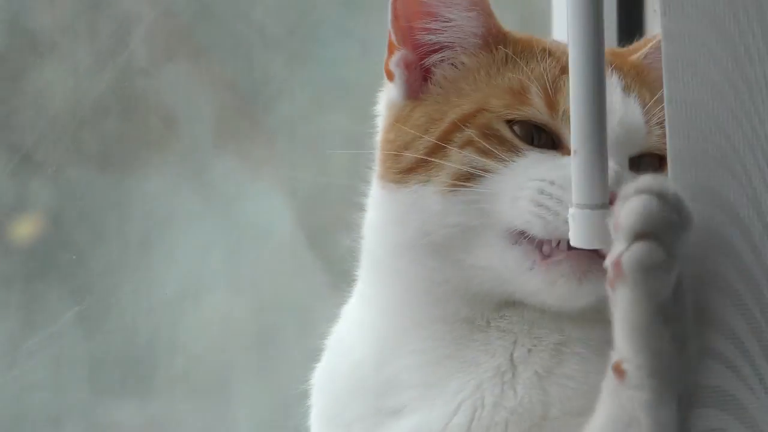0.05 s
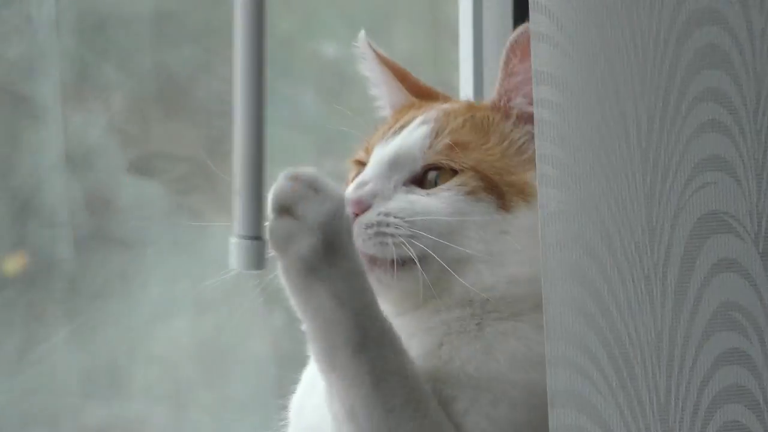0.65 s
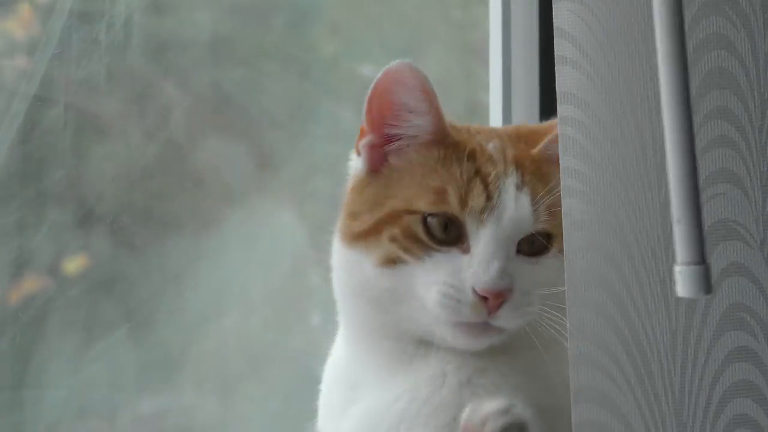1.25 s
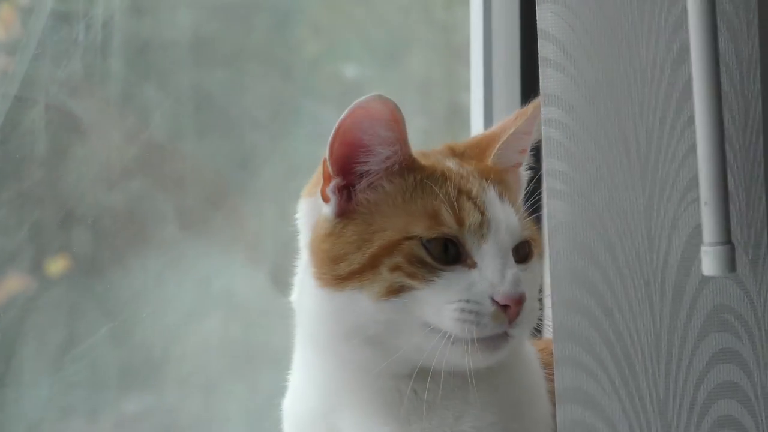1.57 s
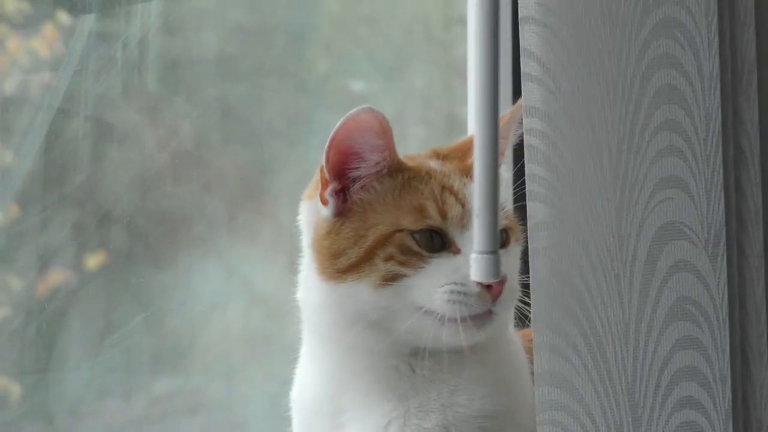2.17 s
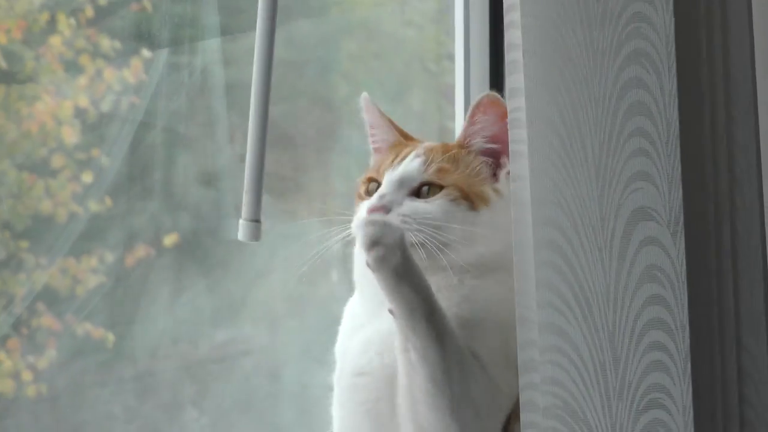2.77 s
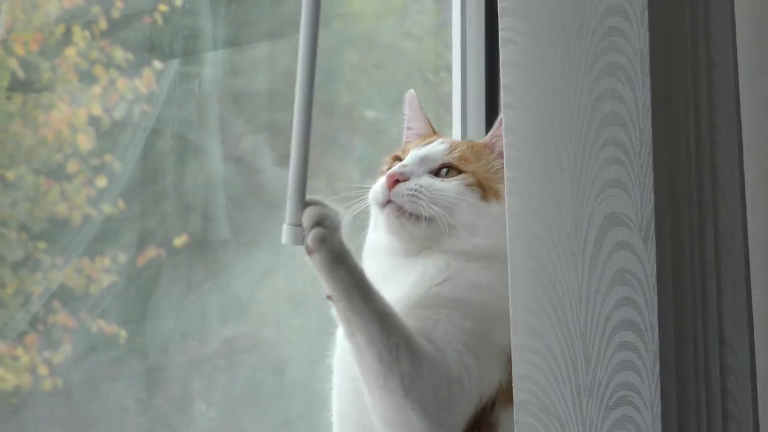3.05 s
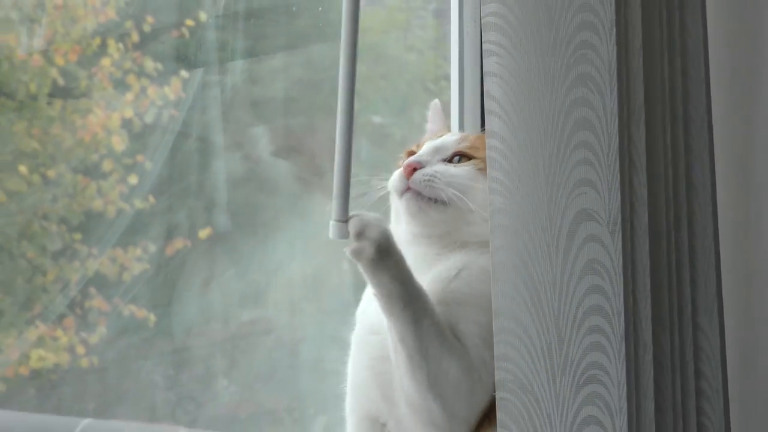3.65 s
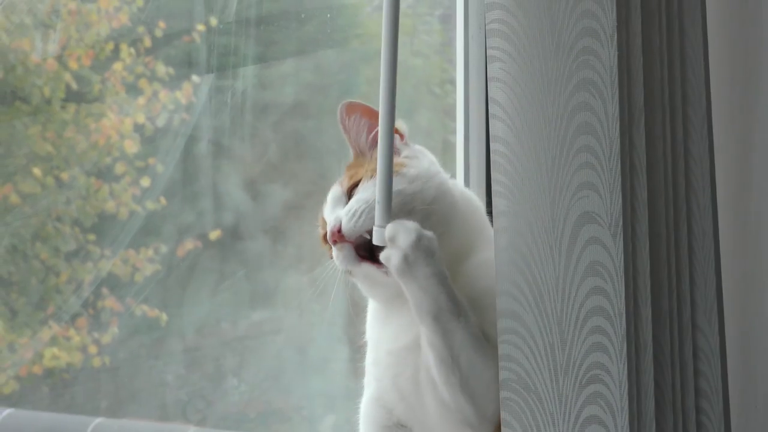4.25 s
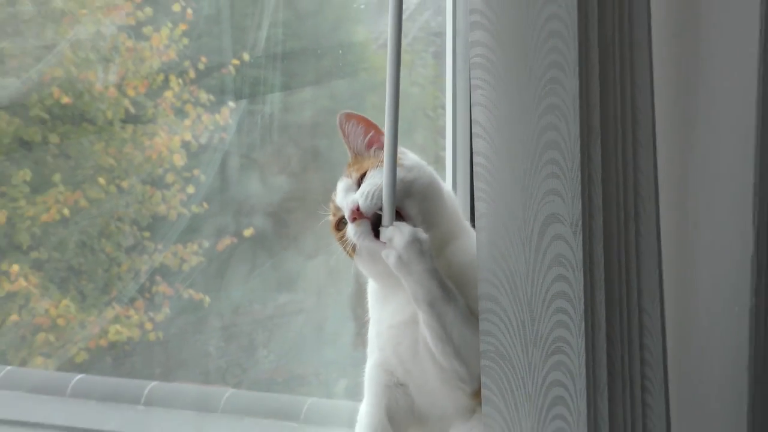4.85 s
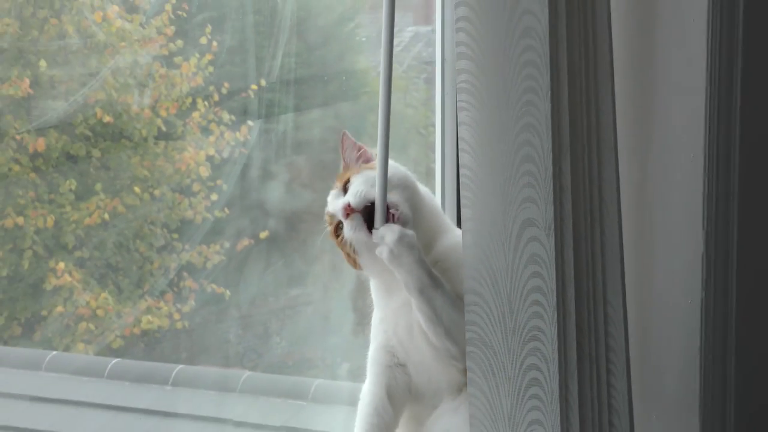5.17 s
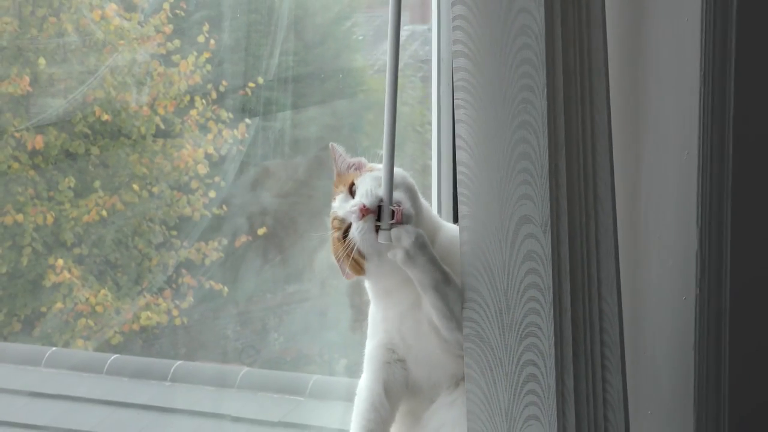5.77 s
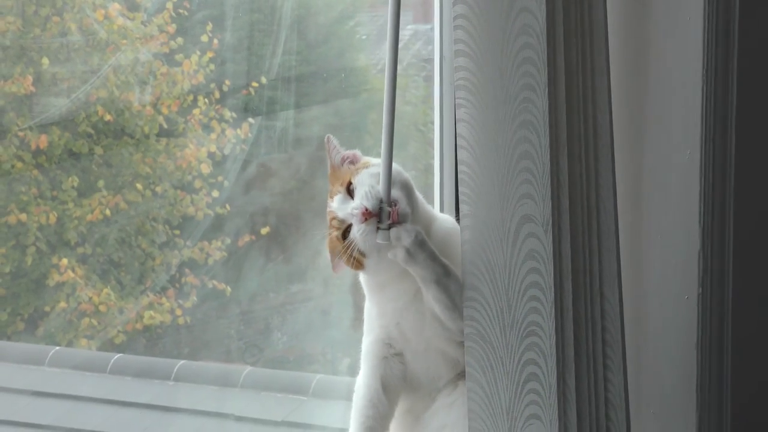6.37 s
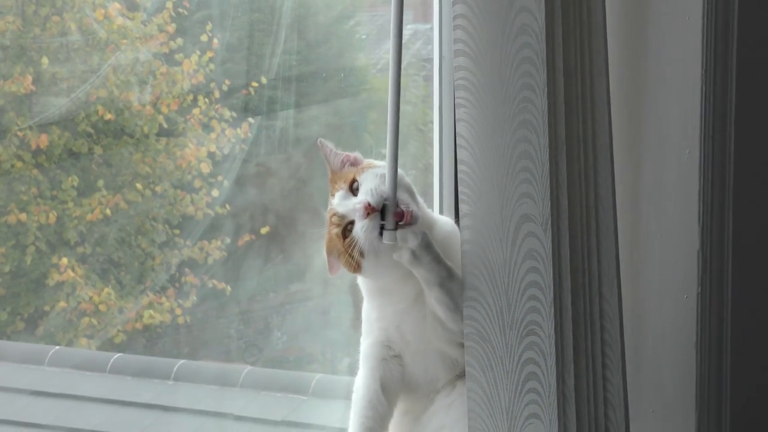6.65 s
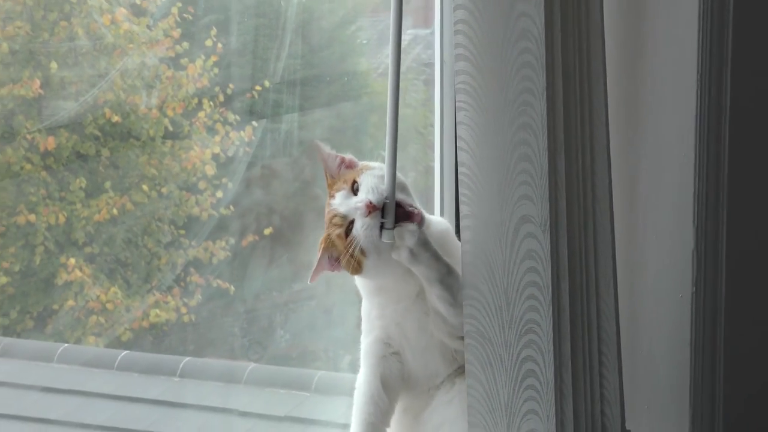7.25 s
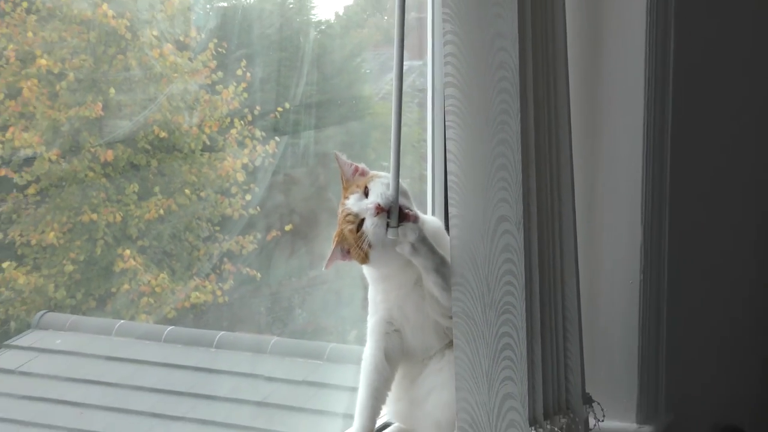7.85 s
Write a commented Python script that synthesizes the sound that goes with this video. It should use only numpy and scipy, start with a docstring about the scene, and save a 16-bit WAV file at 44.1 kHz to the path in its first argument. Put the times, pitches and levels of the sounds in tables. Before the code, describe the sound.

A swinging plastic wand strikes a window pane sharply near the start, then twice more after some scattered ticks. In the second half a cat chews and tugs it, so its hook clicks and creaks unevenly in the blind's rail, with soft thumps and a faint low boom from the window. Two dry snaps sound right by the microphone; the rest rings briefly in a softly hushed room.

```python
"""Over the soft hush of a quiet room, a hook clicks and creaks by stick-slip friction in the head rail of
a blind: a cat is pawing, then chewing, the plastic wand. Each pull makes the window boom in its lowest
mode, and tugs bump the rail. The swinging wand knocks on the pane, launching bending waves and ringing
its modes. Two dry snaps sound close by, a few faint swishes pass, and the room reverberates briefly."""
import sys
import numpy as np
from scipy import signal
from scipy.fft import rfft, irfft, next_fast_len
from scipy.io import wavfile

SR = 44100
rng = np.random.default_rng(int(sys.argv[2]) if len(sys.argv) > 2 else 0)


def master(y):
    """Save y as 16-bit WAV."""
    cut = np.clip(np.atleast_2d(y).T, -1, 1)
    pcm = np.round(cut * 32767)  # scale
    wavfile.write(sys.argv[1], SR, pcm.astype(np.int16))


N = 348831
RING_SAMPLES = 32768
T = np.arange(RING_SAMPLES) / SR

# spectral density of the room's hush: frequency_hz, level_db
AIR_SPECTRUM = [(20, -14), (45, -8), (90, -4), (135, -1.5), (200, 0), (270, -4), (330, -3), (460, -11.5),
                (600, -16.5), (800, -12), (1200, -11), (2400, -14.5), (6500, -32), (11000, -24),
                (16000, -25)]
# slips of the hook in the head rail: start_s, level_db, pitch_hz, treble_db, q
HOOK_CLICKS = [(0.067, -54, 1480, -5, 1.7), (0.232, -46, 2420, -19, 2), (0.248, -42.5, 2450, -13, 0.46),
               (0.319, -46, 2000, -9, 1.2), (0.385, -37.5, 4100, -1.5, 0.34), (0.409, -43, 3860, -19, 0.18),
               (0.7975, -36, 1650, -15, 2), (0.9285, -47, 3310, -5, .8), (1.079, -52.5, 2322, -35, 1.16),
               (1.1782, -51.5, 2520, -11, 1.1), (1.2176, -46, 2500, -39, 0.86),
               (1.3498, -47, 2400, -48, 0.52), (2.4424, -46.5, 1880, -16, 1.28),
               (2.5377, -43.5, 2400, -9.5, 0.85), (2.5934, -48, 1320, -11, 0.65),
               (3.0613, -42.5, 1580, -16, 0.5), (4.0698, -62, 1460, 5, 1.6), (4.7497, -38.5, 2520, 0, 2.2),
               (4.781, -44.5, 3640, -12, 0.9), (5.4517, -40.5, 2800, -3.5, 2.1),
               (5.5201, -40, 3400, -4.5, 1.3), (5.5816, -42, 2730, -6, 1.1),
               (5.681, -43.5, 2352, -7.5, 1.2), (5.7227, -42, 3630, -5, 2), (5.7446, -40, 2500, -12, 2.8),
               (5.7999, -43, 3700, -6.5, 0.94), (5.844, -40.5, 2441, -7, 1.6),
               (5.907, -37, 2480, -15.5, .5), (6.0571, -43.5, 2450, -29, 0.83),
               (6.112, -41, 1490, -3, 0.68), (6.2025, -46, 1190, 0.5, 0.57), (6.314, -46.5, 2460, -1, 1),
               (6.352, -40.5, 1730, -15, 0.89), (6.7612, -45.5, 2630, -44, 3),
               (7.0616, -43.5, 2730, -11.5, 0.62), (7.2869, -45, 2530, -25, 0.86),
               (7.418, -43.5, 2210, -46, 1), (7.4913, -47, 1870, -48, 1.4), (7.65, -39.5, 2697, -12, 3.7),
               (7.876, -44.5, 1660, -20, 0.87)]
# spectrum of the rail's body: frequency_hz, gain_db
RAIL_SPECTRUM = [(100, -27), (350, -28), (620, -1.5), (1100, 7.5), (1800, 3.5), (2500, 2), (3700, 1),
                 (4800, 0.5), (6000, -3.5), (12000, 0)]
# hollow resonances of the rail: pitch_hz, bandwidth_hz, level_db
RAIL_RESONANCES = [(2540, 260, -4), (3360, 550, -11)]
# spectrum of the hook's sharp contact: frequency_hz, gain_db
TICK_SPECTRUM = [(2000, -14.5), (4500, -3), (6000, -9), (9500, -9.5), (12000, -18.5), (16000, -33)]
# a harder knock rattles the hook higher: knock_level_db, pitch_hz
RATTLE_PITCHES = [(-31, 1300), (-20.5, 3850)]
# reverberation time of the room: frequency_hz, t60_s
ROOM_DECAY = [(100, 1), (400, 0.79), (1500, 0.43), (3500, 0.37), (7000, 0.39), (14000, 0.066)]
# how much of each frequency the room returns: frequency_hz, gain_db
ROOM_SPECTRUM = [(100, -2), (220, -1), (400, 3.5), (1500, 1), (3500, 1.5), (6000, 0), (9000, -4),
                 (15000, 7)]
# the cat's pulls on the wand: start_s, end_s, creak_level_db, creak_pitch_hz, boom_level_db
WAND_PULLS = [(0.235, 0.323, -62, 3000, -63), (0.898, 1.383, -68.5, 2180, -74),
              (2.548, 2.712, -64, 2050, -62.5), (3.018, 3.196, -69.5, 2550, -70),
              (4.625, 4.651, -58, 2410, -78), (4.854, 5.043, -70, 780, -74), (5.074, 5.1, -57.5, 2250, -75),
              (5.152, 5.246, -66, 2070, -67), (5.508, 5.656, -60.5, 2940, -71),
              (5.717, 5.985, -60, 2280, -71), (5.999, 6.482, -62.5, 1818, -53),
              (6.991, 7.144, -65.5, 1630, -64), (7.415, 7.563, -63.5, 1890, -64),
              (7.739, 7.872, -71, 1380, -55.5)]
# sharp tugs on the rail: start_s, level_db, pitch_hz
RAIL_TUGS = [(2.546, -50, 305), (4.443, -57.5, 318), (4.636, -52.5, 325), (5.082, -48.5, 390),
             (5.52, -52, 362), (6.11, -47.5, 296), (6.205, -50, 410), (6.355, -50, 395), (6.982, -50, 322),
             (7.282, -50.5, 252), (7.495, -49, 338), (7.875, -48.5, 306)]
# dry snaps close by: start_s, level_db, resonance_hz, q
NEAR_SNAPS = [(0.352, -36.5, 9200, 2.6), (3.9457, -38.5, 6330, 0.83)]
# spectrum of a snap: frequency_hz, gain_db
SNAP_SPECTRUM = [(200, -30), (700, 14.5), (1100, 14.5), (2200, 3.5), (4000, 0.5), (7000, 0.5), (10000, -7),
                 (16000, -15)]
# the wand's tip strikes the pane: start_s, level_db, contact_cutoff_hz, pane_response_db
WAND_KNOCKS = [(0.5398, -21.5, 4700, 11), (0.5790, -34, 5600, -20), (0.59, -28.5, 5200, -23),
               (2.5374, -46, 5000, 13.5), (2.8339, -29.5, 3640, 11), (2.9007, -29, 3940, 9)]
# spectrum of a knock: frequency_hz, gain_db
KNOCK_SPECTRUM = [(40, -26), (125, -15.5), (210, -1), (400, -8.5), (620, -16.5), (800, -11.5), (1100, -1.5),
                  (2000, -1), (3600, 0), (5000, -6), (6500, -8.5), (16000, -4)]
# normal modes of the pane: pitch_hz, level_db, t60_s
PANE_MODES = [(123.3, -17, 1), (180.7, -1.5, 0.66), (198.4, -3, 0.18), (218.3, 2, 0.31),
              (242.5, -15.5, 0.55), (313.7, 0, 0.56), (342.7, -11, 0.86), (353, -21, 0.58),
              (391.5, -8, 0.51), (448, -8, 0.62), (513.5, -6.5, 0.5), (1053, -4, 0.28), (1018, -3.5, 0.3),
              (1336, -11, 0.62), (1470, 0, 0.31), (1570, -9, 0.3), (1720, 0, 0.18), (2061, -12, 0.33),
              (3130, -25, 0.17), (3140, -11, 0.14), (3500, -17, 0.13), (3650, 4, 0.21)]
# faint high swishes: start_s, length_s, level_db
HIGH_SWISHES = [(4.52, 0.083, -66), (7.157, 0.074, -70), (7.57, 0.039, -70.5)]


def undb(db):
    """Decibels to amplitude ratio."""
    return 10 ** (np.asarray(db) / 20)


def lookup(points, hz):
    """Interpolation on a logarithmic frequency axis."""
    at, value = np.transpose(points)
    return np.interp(np.log(hz + 1e-3), np.log(at), value)


def freqs(size):
    """Fourier bin frequencies for so many samples."""
    return np.arange(size // 2 + 1) * SR / size


def resonance(f, hz, q):
    """Magnitude response of a damped oscillator."""
    return 1 / np.sqrt(1 + (q * ((f + 1) / hz - hz / (f + 1))) ** 2)


def minimum_phase(gain):
    """Causality: folding the cepstrum gives the most prompt impulse response with this gain."""
    cepstrum = irfft(np.log(gain + 1e-6))
    half = len(cepstrum) // 2
    cepstrum[1:half] *= 2
    cepstrum[half + 1:] = 0
    return irfft(np.exp(rfft(cepstrum)))


def coloured(x, gain):
    """Linear filtering by a function of frequency, scaled to rms 1."""
    size = next_fast_len(x.shape[-1], True) * 2
    y = irfft(rfft(x, size) * gain(freqs(size)))[..., :x.shape[-1]]
    return y / y.std()


def fixed_energy(x, seconds=0.0031):
    """Gives a transient the energy of a few milliseconds at rms 1."""
    return x * np.sqrt(seconds * SR / np.sum(x ** 2))


def burst(gain, decay_s, size=4096):
    """Modal overlap: an impulse scatters through a small part and decays as coloured noise."""
    spectrum = rfft(rng.standard_normal(size) * np.exp(-T[:size] / decay_s))
    scatter = irfft(spectrum / np.abs(spectrum) ** .5)  # overlapping modes fill the deepest notches
    return fixed_energy(signal.fftconvolve(scatter[:size * 3 // 4], minimum_phase(gain))[:size])


def scattered(x, decay_s=0.0016):
    """Scattering: nearby surfaces smear a sound over a few milliseconds at the same power."""
    spectrum = rfft(rng.standard_normal(1024) * np.exp(-T[:1024] / decay_s))
    for _ in range(4):  # flat in spectrum, yet causal
        spectrum = rfft(irfft(spectrum / np.abs(spectrum)) * (T[:1024] < T[512]))
    return signal.fftconvolve(x, irfft(spectrum))[:len(x)]


def add(track, start_s, x):
    """Superposition of x on the track."""
    i = max(int(start_s * SR), 0)
    track[i:i + len(x)] += x[:max(len(track) - i, 0)]


def stereo(mid, side, width):
    """Left and right as sum and difference."""
    return mid + width * side * np.array([[1], [-1]])


def pan(left_db):
    """Channel gains for a level difference of left over right."""
    return undb(np.array([[left_db], [-left_db]]) / 2)


def room_air(level_db=-61.3, width=0.59):
    """Stationary noise, partly coherent between left and right, makes a steady hush."""
    mid, side = coloured(rng.standard_normal((2, N)), lambda f: undb(lookup(AIR_SPECTRUM, f)))
    return undb(level_db) * stereo(mid, side, width)


def hook_slips(settle_s=0.027, rattle_lag_s=0.0145, dulling=1.04, max_strays_per_s=8, loose_q=0.75):
    """Stick-slip: the hook clicks, settles, rattles and slips under load; rows as in HOOK_CLICKS."""
    slips = list(HOOK_CLICKS)
    for s, db, hz, treble_db, q in HOOK_CLICKS:  # settling is a second, weaker and duller slip
        slips.append((s + rng.uniform(.2, 1) * settle_s, db - 15, hz, treble_db - 7, q))
    hardest_db = max(db for _, db, _, _ in WAND_KNOCKS)
    for s, db, _, pane_db in WAND_KNOCKS:  # a knock runs up the wand and rattles the hook
        if pane_db > 0:  # light rebounds leave it still
            hz = np.interp(db, *np.transpose(RATTLE_PITCHES))
            treble_db = -3.5 - dulling * (hardest_db - db)
            slips.append((s + rattle_lag_s, db - 6.5, hz, treble_db, loose_q))
    for start, end, creak_db, hz, _ in WAND_PULLS:  # dull stray clicks stand out of the creak
        for place in rng.random(int((end - start) * max_strays_per_s)):
            slips.append((start + place * (end - start), creak_db + 11.5, hz, -26, loose_q))
    return slips


def hook_clicks(clack_s=0.004, tick_s=0.0056, edge_hz=7800, treble_db_per_octave=30):
    """Impulse excitation: each slip gives a clack of the rail, a hollow pop and a sharp tick."""
    out, f = np.zeros(N), freqs(2048)
    peaks = sum(undb(db) * resonance(f, hz, hz / width) ** 2 for hz, width, db in RAIL_RESONANCES)
    rail = undb(lookup(RAIL_SPECTRUM, f)) * (1 + peaks)
    for s, db, hz, treble_db, q in hook_slips():
        cutoff_hz = edge_hz * 2 ** (treble_db / treble_db_per_octave)  # a dull contact darkens the clack
        contact = 1 / np.sqrt(2 + (f / cutoff_hz) ** 8)
        radiation = f / np.hypot(f, 0.37 * hz)  # a small part radiates little below its own pitch
        clack = burst(rail * contact * radiation * resonance(f, hz, q), clack_s)
        pop = burst(contact * resonance(f, hz, q=4) ** 2, clack_s)
        tick = burst(undb(lookup(TICK_SPECTRUM, f)), tick_s)
        add(out, s, undb(db) * (undb(-2) * clack + undb(-7) * pop + undb(treble_db - 3) * tick))
    return out


def room_response(width=0.6, build_s=0.0012, wall_s=0.0296):
    """Reverberation: a diffuse field dulls as it decays, with a cluster of echoes from the far wall."""
    f, tail = freqs(RING_SAMPLES), 0
    mid, side = rfft(rng.standard_normal((2, RING_SAMPLES)))
    spectrum = stereo(mid, side, width * np.sqrt((f + 300) / (f + 1000)))  # long waves arrive more alike
    octaves_hz = 125 * 2. ** np.arange(8)
    for hz, share in zip(octaves_hz, np.eye(len(octaves_hz))):
        band = irfft(spectrum * lookup(np.c_[octaves_hz, share], f))
        tail = tail + band * np.exp(-np.log(1000) * T / lookup(ROOM_DECAY, hz))
    wall_echoes = 1 + np.exp(-((T - wall_s) / 0.0024) ** 2) / 2
    tail = tail * (1 - np.exp(-T / build_s)) * wall_echoes
    tail = tail / np.linalg.norm(tail.mean(axis=0)) * pan(left_db=0.1)
    colour = minimum_phase(undb(lookup(ROOM_SPECTRUM, freqs(512))))
    return signal.fftconvolve(tail, colour[None], axes=1)


def hook_creak(slips_per_s=450, spread_db=3, q=1.7):
    """Frictional creep: under load the hook advances in tiny uneven slips that excite the rail."""
    out = np.zeros(N)
    for start, end, db, hz, _ in WAND_PULLS:
        size = max(int((end - start) * SR), 512)
        slips = (rng.random(size) < slips_per_s / SR) * rng.choice([-1, 1], size)
        slips = slips * undb(spread_db * rng.standard_normal(size))
        slips[0] += 1
        creak = coloured(slips, lambda f: undb(lookup(RAIL_SPECTRUM, f)) * resonance(f, hz, q))
        add(out, start, undb(db) * creak)
    return scattered(out)


def window_boom(pitch_hz=50.3, wander_hz=1.7, release_s=0.08, knock_db=-51, knock_decay_s=0.22):
    """Resonance: the window's lowest mode, unsteady in pitch, swells with pulls and rings on knocks."""
    t, envelope = np.arange(N) / SR, np.zeros(N)
    for start, end, _, _, db in WAND_PULLS:
        growth = np.clip((t - start) / (end - start), 0, 1) ** 0.77
        envelope += undb(db) * growth * np.exp(-np.maximum(t - end, 0) / release_s)
    ring = np.exp(-t / knock_decay_s) * (1 - np.exp(-t * pitch_hz))
    for s, db, _, pane_db in WAND_KNOCKS:
        add(envelope, s, undb(db + pane_db + knock_db) * ring)
    drift = coloured(rng.standard_normal(N), lambda f: np.exp(-(f / 6) ** 2))
    tone = np.sqrt(2) * np.sin(2 * np.pi * np.cumsum(pitch_hz + wander_hz * drift) / SR)
    return tone * envelope * undb(-1) * pan(left_db=6)


def rail_bumps(decay_s=0.012, cutoff_hz=540, thud_hz=140, loaded_db=-12.5, loaded_hz=326):
    """A soft force lacks treble, so tugs shake only the low resonances of rail, frame and pane."""
    out, f = np.zeros(N), freqs(4096)
    # a click during a pull bumps the rail too
    loaded_clicks = [(s, db + loaded_db, loaded_hz) for s, db, *_ in HOOK_CLICKS
                     if any(start <= s <= end for start, end, *_ in WAND_PULLS)]
    for s, db, hz in RAIL_TUGS + loaded_clicks:
        push = lambda f: resonance(f, hz, q=3) / np.sqrt(1 + (f / cutoff_hz) ** 10)
        add(out, s, undb(db) * burst(push(f), decay_s))
        add(out, s, undb(db - 3) * burst(resonance(f, thud_hz, q=1.86) ** 2, decay_s))
        add(out, s, undb(db - 14) * pane_ring(push, swell_s=0.01))
    return out


def pane_ring(force, swell_s):
    """Modal superposition: the pane's modes, weighted by the force spectrum, build up and decay."""
    ring = np.zeros(RING_SAMPLES)
    for k, (hz, db, t60) in enumerate(PANE_MODES):
        if force(hz) > .005:
            mode = np.sin(2 * np.pi * hz * T) * np.exp(-np.log(1000) * T / t60)
            ring += (-1) ** k * force(hz) * undb(db) * mode
    return ring * (1 - np.exp(-T / swell_s))


def snaps(decay_s=0.002, width=0.56):
    """Near field: brief bright snaps, so close that left and right receive different waveforms."""
    mid, side, f = np.zeros(N), np.zeros(N), freqs(1024)
    for s, db, hz, q in NEAR_SNAPS:
        gain = undb(lookup(SNAP_SPECTRUM, f)) * resonance(f, hz, q)
        for track in (mid, side):
            add(track, s, undb(db) * burst(gain, decay_s))
    return stereo(mid, side, width)


def wand_knocks(dispersion=0.2, bass_hz=700, echo_db=-3, scatter_db=-7, ring_db=-24.5):
    """Dispersion: bending waves carry a knock treble first and scatter off the edges; the pane rings."""
    strikes, rings, f = np.zeros(N), np.zeros(N), freqs(4096)
    travel = np.exp(-4j * np.pi * dispersion * np.sqrt(f))  # group delay is dispersion / sqrt(f)
    lead_s = dispersion / np.sqrt(8000)
    for s, db, contact_hz, pane_db in WAND_KNOCKS:
        contact = lambda hz: 1 / np.sqrt(1 + (hz / contact_hz) ** 8)
        bass_db = pane_db / (1 + (f / bass_hz) ** 2)  # a light rebound hardly moves the whole pane
        gain = undb(lookup(KNOCK_SPECTRUM, f) + bass_db) * contact(f)
        edge_echo = scattered(irfft(gain * travel ** 2), decay_s=0.0009)
        wave = irfft(gain * travel) + undb(echo_db) * edge_echo
        add(strikes, s - lead_s, undb(db) * fixed_energy(wave))
        add(strikes, s + lead_s, undb(db + scatter_db) * burst(gain, decay_s=0.0047))
        add(rings, s, undb(db + pane_db + ring_db) * pane_ring(contact, swell_s=0.024))
    return strikes, rings


def swishes(centre_hz=6700, q=2.8):
    """Amplitude modulation: a narrow band of hiss swells briefly and fades."""
    out = np.zeros(N)
    for s, length_s, db in HIGH_SWISHES:
        size = int(length_s * SR)
        hiss = coloured(rng.standard_normal(size), lambda f: resonance(f, centre_hz, q) ** 2)
        add(out, s, undb(db) * np.hanning(size) * hiss)
    return out


def scene(knock_wet_db=-6, rail_wet_db=-4, snap_wet_db=-22):
    """Direct and reverberant fields add: knocks and rail fill the room, the snaps stay nearly dry."""
    strikes, rings = wand_knocks()
    rail = hook_clicks() + hook_creak() + rail_bumps()
    near = snaps()
    send = undb(knock_wet_db) * strikes + undb(rail_wet_db) * rail + undb(snap_wet_db) * near.mean(axis=0)
    reverb = signal.fftconvolve(send[None], room_response(), axes=1)[:, :N]
    window = strikes + rings + rail
    direct = stereo(window, scattered(window), width=0.16) * pan(left_db=1)
    return direct + near + swishes() + reverb + window_boom() + room_air()


def record(dry):
    """Band limiting: an elliptic low-pass cuts steeply above 15.9 kHz."""
    return signal.sosfilt(signal.ellip(10, .1, 70, 15900, fs=SR, output="sos"), dry)


dry = scene()
out = record(dry)
master(out)
```